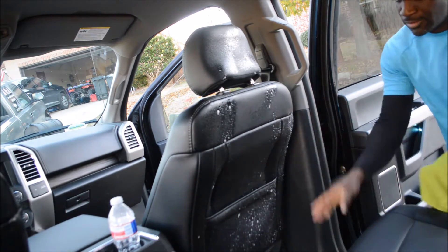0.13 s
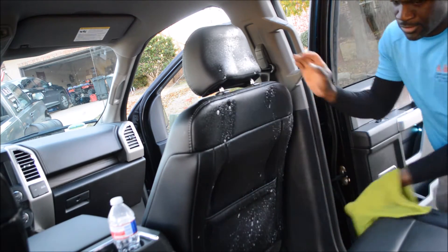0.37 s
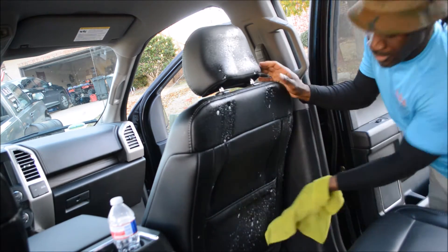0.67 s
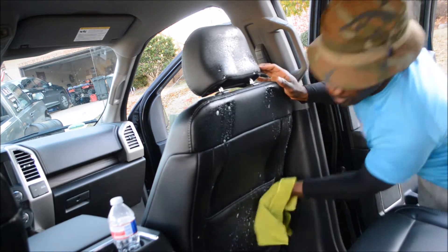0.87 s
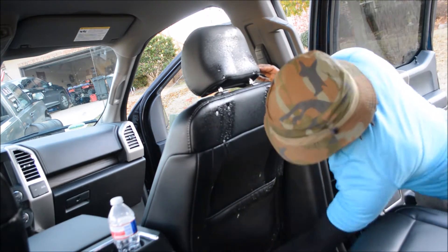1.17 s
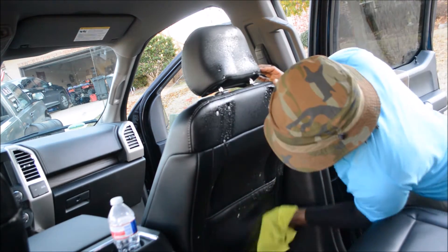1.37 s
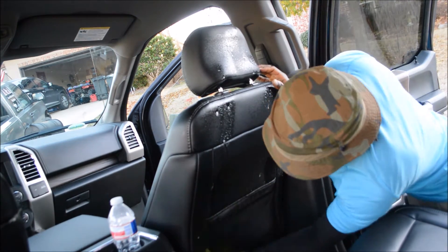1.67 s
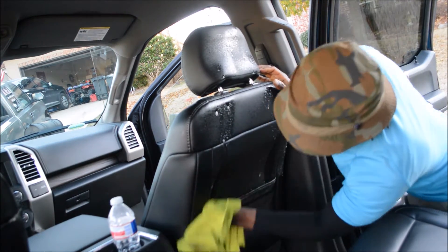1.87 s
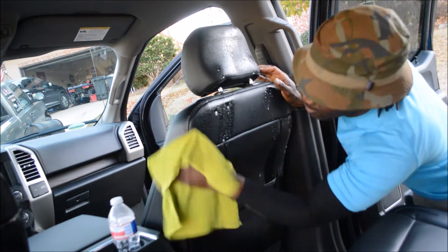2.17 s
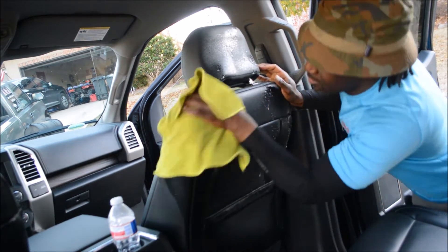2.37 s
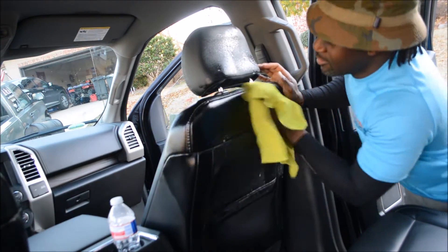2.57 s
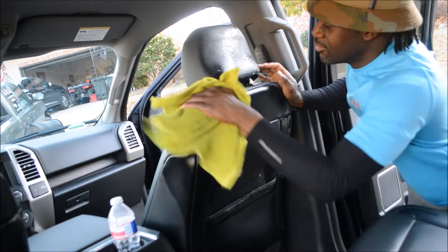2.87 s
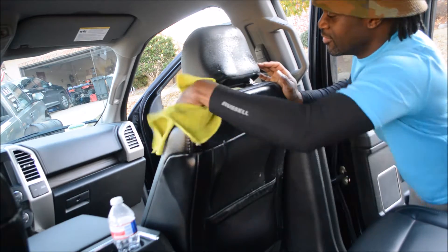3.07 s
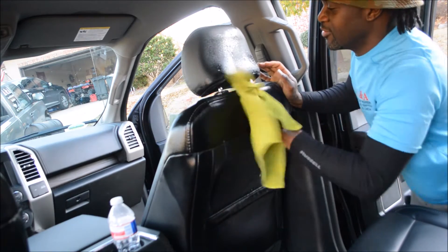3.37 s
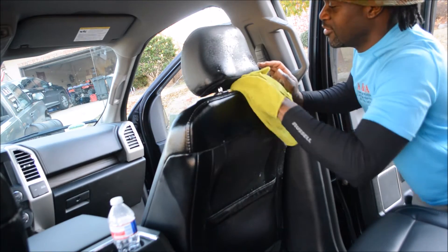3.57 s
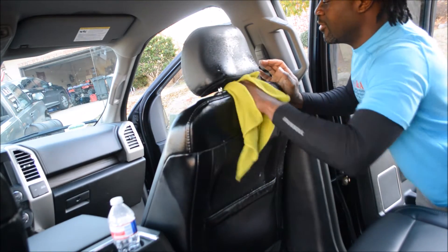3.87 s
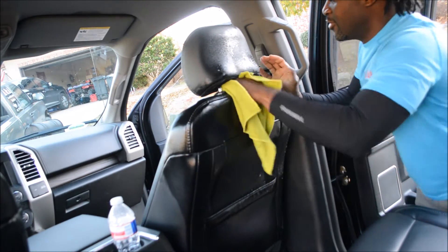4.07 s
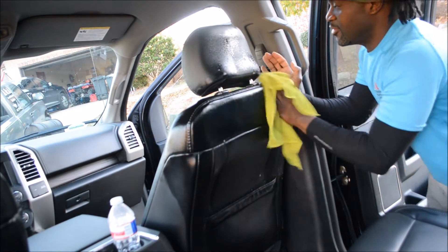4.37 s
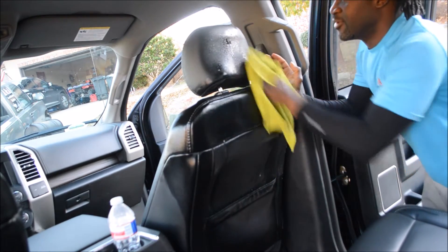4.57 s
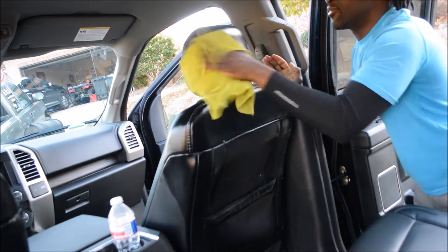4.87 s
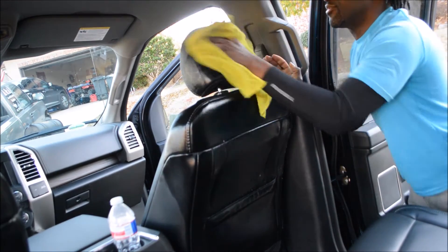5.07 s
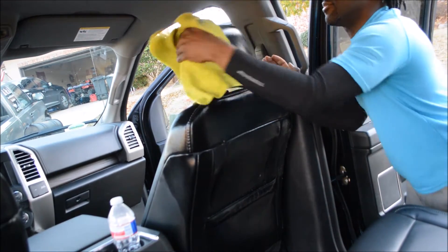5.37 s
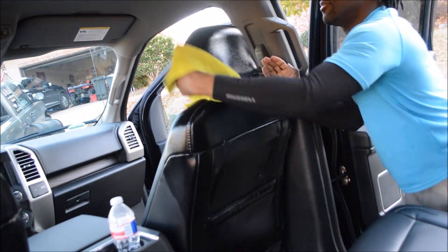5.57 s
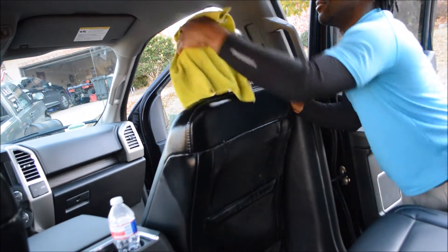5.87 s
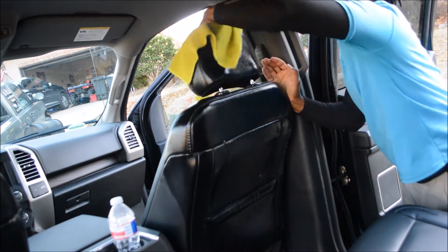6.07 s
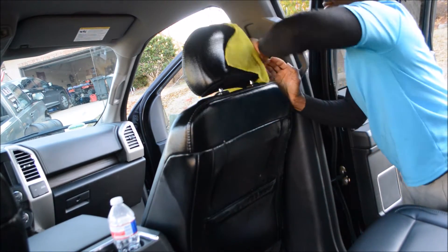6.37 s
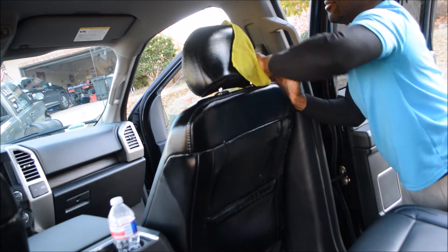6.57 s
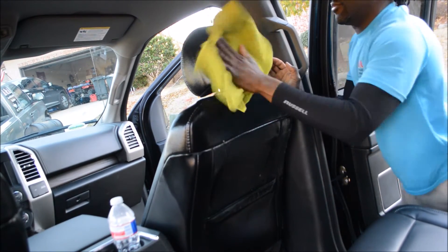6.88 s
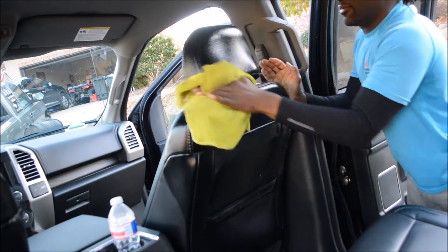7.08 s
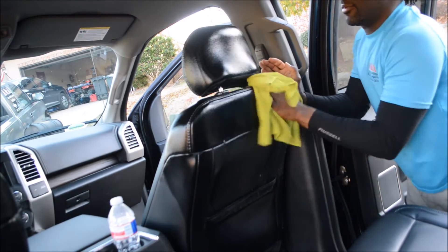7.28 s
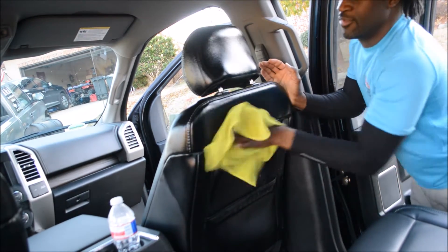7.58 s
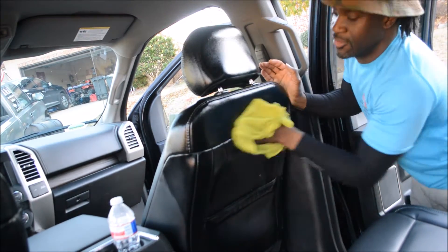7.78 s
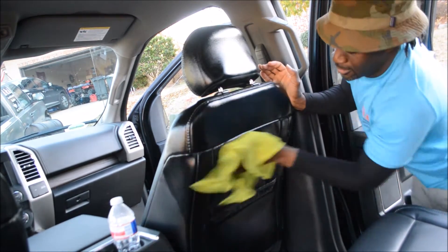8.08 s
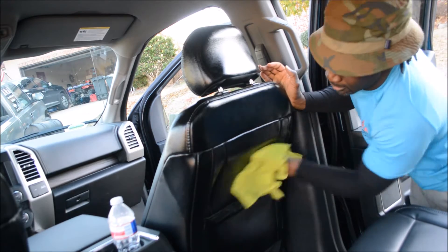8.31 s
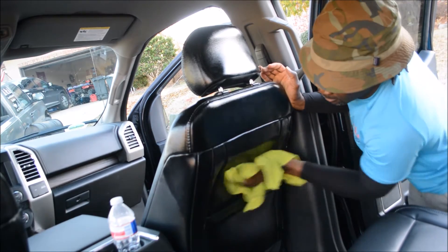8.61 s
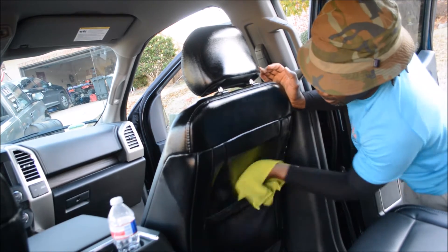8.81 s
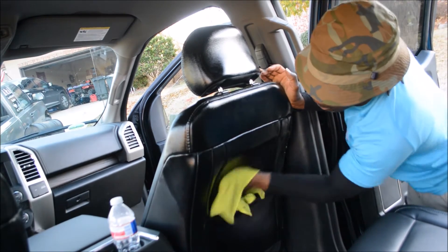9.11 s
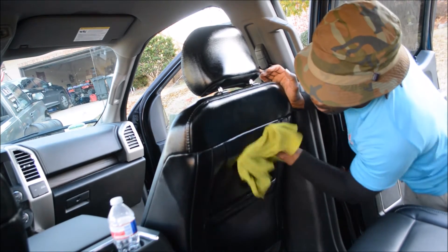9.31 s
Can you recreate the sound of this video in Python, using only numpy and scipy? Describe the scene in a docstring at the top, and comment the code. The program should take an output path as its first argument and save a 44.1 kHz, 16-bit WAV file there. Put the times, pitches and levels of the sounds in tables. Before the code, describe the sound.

A cloth towel rubs a leather car seat in quick, uneven strokes, hissing and rasping, with a few hollow knocks over faint outdoor noise.

```python
"""A cloth towel is wiped over a leather seat back and head rest in a car cabin with the doors open.
Its fibres hiss on the leather as filtered noise; the same drag shakes the seat shell, back panel and cushion.
Hand and towel knock the seat now and then, with slaps of noise and dying notes; sticking leather groans.
Behind this, a bird chirps faintly in falling whistles over steady outdoor noise. Both channels are the same."""
import sys
import numpy as np
from scipy import signal
from scipy.fft import rfft, irfft, next_fast_len
from scipy.io import wavfile

SR = 44100
rng = np.random.default_rng(int(sys.argv[2]) if len(sys.argv) > 2 else 0)


def wav_record(signal):
    """Record a signal, one row per channel, as 16-bit PCM in the file named by sys.argv[1]."""
    frames = np.transpose(np.atleast_2d(signal))
    bounded = np.clip(frames, -1, 1)
    # unit amplitude maps onto the largest positive 16-bit level
    quanta = np.round(bounded * 32767).astype(np.int16)
    wavfile.write(sys.argv[1], SR, quanta)


N = 416744   # length in samples


def from_db(db):
    """Turns decibels into a plain amplitude factor."""
    return 10 ** (np.asarray(db) / 20)


def rms_one(x):
    """Scales a signal so that its average strength (rms) is 1."""
    return x / np.sqrt(np.mean(x ** 2) + 1e-20)


def drift(rate_hz):
    """Slow random wandering of rms 1: noise through two equal one-pole low-passes at rate_hz."""
    step = 40   # worked out at every 40th sample, then joined by straight lines
    r = np.exp(-2 * np.pi * step * rate_hz / SR)
    noise = rng.standard_normal(N // step + 2002)
    slow = signal.lfilter([1], [1, -2 * r, r * r], noise)[2000:]   # skip the filter's start
    return np.interp(np.arange(N) / step, np.arange(len(slow)), rms_one(slow))


def coloured(x, spectrum):
    """Shapes x in frequency by joining the (f/Hz, level/dB) points; the result has rms 1."""
    size = next_fast_len(N)
    point_hz, point_db = np.transpose(spectrum)
    bin_hz = np.arange(size // 2 + 1) * SR / size
    gain = from_db(np.interp(np.log(bin_hz + 1), np.log(point_hz), point_db))
    return rms_one(irfft(rfft(x, size) * gain, size)[:N])


def ring(clicks, hz, t60):
    """Each unit click starts a sine of height 1 that falls by 60 dB in t60 seconds."""
    r = from_db(-60 / (t60 * SR))
    turn = 2 * np.pi * hz / SR
    return signal.lfilter([0, np.sin(turn)], [1, -2 * r * np.cos(turn), r * r], clicks + 1e-18)


def note(hz, db, rise, t60):
    """A sine that swells within about rise seconds and dies away by 60 dB in t60 seconds."""
    t = np.arange(SR // 3) / SR
    swell = 1 - np.exp(-(t / rise) ** 2)
    return from_db(db - 60 * t / t60) * swell * np.sin(2 * np.pi * hz * t)


def pressure(rise, fall):
    """The hand presses down and lets go again: 0 to 1 to 0, along a sine curve."""
    up = np.linspace(0, 1, round(rise * SR))
    down = np.linspace(1, 0, round(fall * SR))
    return np.sin(np.pi / 2 * np.r_[up, down])


# relative spectrum of the fibre hiss: f/Hz, level/dB (per Hz)
FIBRE_SPECTRUM = [(880, -64), (1500, -35), (1920, -13.5), (2760, -10), (3130, -10.5), (3530, -8.5),
                  (3740, -7.5), (6050, -8), (8880, 2.5), (11000, -5.5), (15700, -20.5)]
# low modes of cushion and frame: f/Hz, relative level/dB, t60/s
CUSHION_MODES = [(30.4, 1.5, 0.27), (53, -1.5, 0.29), (78, 2.5, 0.21), (98, -14.5, 0.24), (136.7, -1, 0.18),
                 (210, -1.5, 0.086), (256, -12, 0.16), (327, -2, 0.074)]
# resonances of the hollow back panel: f/Hz, width/Hz, relative level/dB, signed weight
PANEL_MODES = [(755, 37, -4.5, 0.75), (1217, 84, 1, -1.09), (1389, 114, 4.5, 0.79)]
# times when the towel is on that panel: from t/s, to t/s, level against the shell/dB
ON_PANEL = [(0.8, 1.786, 0), (1.8, 2.65, -5.5), (3.1, 3.5, -2), (7.0, 8.0, -3), (8.0, 9.446, -5)]


def wiping():
    """The same drag hisses in the fibres, rings the shell and back panel, and jogs the cushion."""
    drag, shake, taut_db, rock = strokes()
    judder_db = drift(29)   # the grip of the hand is never even
    fibres = coloured(catches(20000, spread_db=2.0), FIBRE_SPECTRUM)
    hiss = fibres * drag * from_db(1.04 * judder_db)

    grain = catches(4000, spread_db=3.0)
    rasp = rms_one(shell(grain, taut_db, patchy_db=1.5))
    hum = rms_one(shell(grain, 0, patchy_db=2.0, modes=PANEL_MODES))
    t = np.arange(N) / SR
    on_panel = sum(from_db(db) * ((t >= start) & (t < end)) for start, end, db in ON_PANEL)
    body = (rasp + hum * on_panel) * shake * from_db(1.2 * judder_db)

    pushes = catches(140, spread_db=2.5)
    jogs = 0
    for hz, db, t60 in CUSHION_MODES:
        jogs = jogs + from_db(db) * ring(pushes * rng.standard_normal(N), hz, t60)
    foam = signal.butter(2, [28, 400], "band", fs=SR, output="sos")   # foam takes the edge off
    padded = signal.sosfilt(foam, jogs)
    return hiss + body + rms_one(padded) * rock


# strokes of the towel: firmest moment t/s, rise/s, fall/s, fibre hiss level/dB, seat shell level/dB,
# tautness under the hand/(dB per octave), cushion level/dB; levels are before the judder
STROKES = [(0.226, 0.021, .03, -52, -55, 4, -55), (0.46, 0.14, 0.03, -56.5, -54.5, 4, -45),
           (0.528, 0.037, .05, -45, -34, -1, -46), (0.76, 0.045, 0.044, -43.5, -47, -2, -44.5),
           (0.992, .22, 0.24, -37.5, -35, 0.5, -50), (1.289, 0.23, 0.17, -38, -35.5, 1, -43.5),
           (1.492, 0.19, 0.26, -38, -36, 2, -58), (1.68, .12, 0.13, -38.5, -47.5, 2, -48.5),
           (1.857, 0.13, 0.07, -35, -35, 2, -42.5), (2.01, 0.3, 0.17, -40.5, -48, -6, -47.5),
           (2.224, .17, 0.085, -37.5, -40.5, -2.5, -51), (2.55, 0.4, 0.11, -40.5, -41, -0.5, -52.5),
           (2.729, 0.11, 0.1, -39, -34, 0.5, -53), (2.85, 0.11, 0.063, -45, -52.5, -5, -43.5),
           (2.96, 0.1, 0.15, -43.5, -47, -5, -46), (3.336, 0.26, 0.15, -41, -43, -4, -51.5),
           (3.45, 0.045, 0.045, -42, -44.5, 1.5, -48), (3.51, .04, 0.037, -51, -48, -1, -58),
           (3.62, 0.037, 0.11, -62, -59.5, 1, -52), (3.69, 0.013, 0.055, -48.5, -49.5, 2, -55),
           (3.87, 0.11, 0.14, -43.5, -45, -1, -48.5), (4.0, .1, 0.066, -44.5, -46, 0, -42),
           (4.12, 0.068, .08, -51, -51, -1, -44), (4.3, .2, 0.13, -42, -43, -2.5, -49),
           (4.41, 0.033, 0.044, -60, -37.5, -1, -50), (4.6, 0.2, 0.13, -41, -42, -3, -52),
           (4.74, 0.098, 0.077, -39.5, -40, 1.5, -59), (4.782, 0.13, 0.045, -41, -38.5, 1.5, -41),
           (4.88, 0.081, 0.12, -38, -36.5, -3.5, -42), (5.03, 0.058, 0.11, -37, -39, -2.5, -47),
           (5.18, 0.063, 0.042, -38.5, -53, -6, -40), (5.27, 0.054, 0.42, -43.5, -53, -6, -46.5),
           (5.6, .17, 0.14, -42.5, -52.5, -3.5, -49), (5.76, 0.15, 0.1, -42, -52.5, -11, -50),
           (5.97, 0.4, 0.14, -43, -44, -2.5, -58), (6.11, 0.15, 0.1, -45, -55, -3, -60),
           (6.256, 0.14, 0.12, -42, -46.5, -3, -47.5), (6.44, 0.15, .055, -43, -53.5, -4, -50),
           (6.62, 0.17, 0.3, -43, -53, -3.5, -61), (6.769, .1, 0.083, -41, -40, -1.5, -67),
           (6.89, 0.18, 0.17, -39.5, -47, -4, -53), (7.1, 0.097, 0.2, -41.5, -44, -7, -47),
           (7.229, 0.13, .075, -44, -43, -0.5, -57), (7.46, 0.2, 0.098, -39, -37.5, 0, -49.5),
           (7.612, 0.11, .11, -39, -33, 0.5, -49), (7.808, 0.13, 0.2, -38.5, -35, 1.5, -44.5),
           (8.049, 0.12, 0.15, -41.5, -38, -2, -41), (8.18, 0.093, 0.034, -51, -37, -2.5, -38.5),
           (8.3, 0.18, 0.48, -47, -47.5, 0, -51.5), (8.616, 0.14, 0.13, -49, -42, -2.5, -42.5),
           (8.82, 0.14, .1, -49.5, -47.5, -4, -57), (8.96, 0.22, 0.098, -46, -44.5, 0, -54),
           (9.1, 0.081, 0.15, -48, -43, -1.5, -52), (9.44, 0.26, .1, -46, -47.5, -2.5, -51)]
HISS_POWER, SHELL_POWER = 0.98, 2.25   # hiss nearly follows the pressure; the shell needs a firm push
CUSHION_SETTLE_S = 0.041


def strokes():
    """Overlapping strokes add their power; tautness leans to the stroke that shakes the shell most."""
    hiss, shake, taut, rock = np.zeros((4, N + SR))
    for s, rise, fall, hiss_db, shell_db, taut_db, cushion_db in STROKES:
        rise, fall = max(rise, .005), max(fall, .005)
        push = pressure(rise, fall)
        start = round((s - rise) * SR)
        span = slice(start, start + len(push))
        shell_power = (from_db(shell_db) * push ** SHELL_POWER) ** 2
        hiss[span] += (from_db(hiss_db) * push ** HISS_POWER) ** 2
        shake[span] += shell_power
        taut[span] += shell_power * taut_db
        rock[span] += from_db(cushion_db) ** 2 * push
    taut_db = taut / (shake + 1e-12)
    r = np.exp(-1 / (CUSHION_SETTLE_S * SR))
    settled = signal.lfilter([1 - r], [1, -r], rock[:N])   # the cushion follows the push late
    return np.sqrt(hiss[:N]), np.sqrt(shake[:N]), taut_db[:N], np.sqrt(settled)


def catches(per_s, spread_db):
    """Loops of the towel catch on the leather grain and let go: random clicks of uneven size."""
    sizes = from_db(spread_db * np.minimum(rng.exponential(1, N), 5))
    signs = rng.choice([-1, 1], N)
    happens = rng.random(N) < per_s / SR
    return rms_one(sizes * signs * happens)


# resonances of the seat shell under rubbing and slaps: f/Hz, width/Hz, relative level/dB, signed weight
SHELL_MODES = [(420, 520, -14.5, 0.89), (586, 105, -6.5, -1.05), (790, 165, -1, 0.45),
               (1131, 270, 1, 0.041), (1365, 249, 0, -0.89), (1610, 456, -0.5, 0.68),
               (2028, 503, -3.5, -0.65), (2430, 260, -7, -0.58), (3116, 780, -7, 0.65),
               (4610, 2700, -15.5, -0.71)]


def shell(force, taut_db, patchy_db, modes=SHELL_MODES):
    """Resonances side by side; a taut spot favours the high ones, and each wavers in level."""
    out = 0
    for hz, width_hz, db, weight in modes:
        r = np.exp(-np.pi * width_hz / SR)
        b = np.array([1, 0, -1]) * (1 - r * r) / 2
        a = [1, -2 * r * np.cos(2 * np.pi * hz / SR), r * r]
        mode = signal.lfilter(b, a, force)
        tilt_db = taut_db * np.log2(hz / 1200)   # tautness tips the balance around 1200 Hz
        out = out + weight * from_db(db + tilt_db + patchy_db * drift(33.0)) * mode
    return out


# knocks and scuffs, with relative levels: t/s, slap level/dB, slap treble level/dB, slap fall/s (by 30 dB),
# tautness/(dB per octave), shell note f/Hz, its level/dB,
# panel level/dB, cushion level/dB, frame level/dB, cabin boom level/dB
KNOCKS = [(0.049, -29.5, -17, 0.046, 1, 1235, -39, -29, -36, -36, -16.5),
          (0.205, -40, -40, 0.051, 1, 1330, -52, -41, -32, -50, -44),
          (0.256, -2, -1, 0.023, -0.5, 1230, -16, -18, -35, -9.5, -14.5),
          (0.51, -34, -37, 0.031, 6.5, 1370, -38, -29, -45, -54, -55),
          (0.792, -33, -21, 0.11, -5, 1240, -38, -41, -32.5, -53, -51),
          (0.839, -26, -40, 0.015, 1, 2100, -32, -41, -59, -40, -44),
          (1.109, -17, -8, 0.025, -15, 775, -18, -26, -17.5, -33, -41),
          (1.141, -8, -4.5, 0.028, -2.5, 1570, -22, -27, -50, -50, -55),
          (1.862, -17, -23, 0.024, -2, 1490, -36, -34, -30.5, -51, -31.5),
          (2.72, -14, -40, 0.019, 2, 1255, -19, -49, -55, -57, -58),
          (3.416, -45, -40, 0.03, 2, 859, -38, -36, -42, -55, -55),
          (3.532, 1, 9.5, 0.015, -6, 880, -5.5, -21, -23.5, -32, -45),
          (3.541, -16, -10, 0.021, -3.5, 700, -20.5, -31, -41, -24.5, -43),
          (3.683, -41, -19, 0.039, -14.5, 1260, -44, -35, -38, -27.5, -57),
          (4.402, -29, -30, 0.048, 2.5, 720, -35, -26, -50, -72, -86),
          (4.609, -43, -35, 0.04, -14, 824, -36, -40, -35, -29, -45),
          (4.785, -20, -42, 0.012, -12.5, 1116, -23.5, -22.5, -18, -28, -22),
          (4.878, -15, -35, 0.034, 1.5, 625, -22, -33.5, -49, -48, -54),
          (5.001, -18, -14, 0.019, -0.5, 1520, -25, -30.5, -35, -39, -57),
          (5.061, -15.5, -27, 0.023, 0, 710, -26.5, -48, -55, -49, -52),
          (5.162, -18.5, -32, 0.049, -6.5, 1285, -25, -23.5, -25, -30, -21.5),
          (5.371, -31.5, -48, 0.024, -8, 1300, -39, -42, -50, -50, -56),
          (5.383, -40, -50, 0.022, -8, 700, -55, -55, -44, -31.5, -33.5),
          (6.444, -34.5, -40, 0.074, -5, 587, -47, -41, -50, -39, -46),
          (6.98, -33, -37, 0.019, -11, 690, -32.5, -44, -41, -42, -50),
          (6.999, -47, -43, 0.02, -9, 705, -50, -37, -32.5, -34.5, -46),
          (7.166, -30, -35, 0.047, 0, 810, -39, -47, -27, -50, -41),
          (7.849, -30, -45, 0.045, -3, 1240, -39, -53, -39, -34, -53),
          (8.025, -16.5, -11.5, 0.033, -2, 870, -25, -30.5, -30, -50, -47),
          (8.053, -19, -30, 0.01, 6, 885, -24, -30, -48, -44, -45),
          (8.162, -18.5, -11, 0.024, 2.5, 690, -22.5, -45, -45, -34, -43),
          (8.222, -16.5, -8, 0.015, 3.5, 1430, -28, -31, -62, -51, -49),
          (8.406, -33, -44, 0.027, 0, 610, -37, -43, -32, -49, -45),
          (8.61, -35, -16, 0.034, 6, 670, -27, -54, -27.5, -38, -31),
          (8.843, -30, -9.5, 0.022, 7.5, 1350, -45, -49, -43, -43, -40)]
# notes of a knock, one group each for panel, cushion, frame and cabin:
# f/Hz, relative level/dB, rise/s, t60/s
STRUCK_NOTES = [
    [(152.6, -3.5, 0.00099, 0.15), (200.8, 1.5, 0.0024, 0.096), (230.4, -3.5, 0.0041, 0.071),
     (333, -4, 0.0032, 0.068)],
    [(123.5, 4, 0.013, 0.14), (109.2, -6, 0.0069, 0.16)],
    [(76.1, 3, 0.0084, .2), (87.5, -6, 0.018, 0.19)],
    [(57.4, 0, 0.018, 0.38), (64.3, -2, 0.013, 0.36)],
]
# relative spectrum of the bright part of a slap: f/Hz, level/dB (per Hz)
CRACK_SPECTRUM = [(880, -40), (1900, -12), (3000, -8), (4200, -13), (6500, -9), (8800, 5), (10500, -6),
                  (15700, -34)]


def knocks():
    """Each knock is a slap of noise with a bright crack, and notes that swell and die away."""
    slap, bright, taut_db, out = np.zeros((4, N))
    t = np.arange(SR // 3) / SR
    parts = np.array([sum(note(*mode) for mode in modes) for modes in STRUCK_NOTES])
    for s, slap_db, treble_db, fall, spot_db, ring_hz, ring_db, *parts_db in KNOCKS:
        start = round(s * SR)
        span = slice(start, start + len(t))
        attack = np.minimum(t / 0.0036, 1)
        fall = max(fall, .004)
        slap[span] += from_db(slap_db - 30 * t / fall) * attack
        sharp = from_db(-30 * t / (0.2 * fall))
        cabin_tail = 0.22 * from_db(-30 * t / (1.8 * fall))
        bright[span] += from_db(treble_db) * attack * (sharp + cabin_tail)
        taut_db[span] = spot_db
        out[span] += note(ring_hz, ring_db, rise=0.001, t60=0.033)
        out[span] -= from_db(parts_db) @ parts   # these parts start in the opposite direction
    out += from_db(8) * shell(slap * rng.standard_normal(N), taut_db, patchy_db=2.0)
    return out + from_db(-14.5) * bright * coloured(rng.standard_normal(N), CRACK_SPECTRUM)


# groans and squeaks where the leather sticks: start t/s, nominal length/s (lasts 1.1 times this),
# level/dB (before the flutter), first f/Hz, last f/Hz
GROANS = [(0.367, 0.062, -53, 1400, 1530), (0.497, 0.058, -29.5, 1410, 1500), (5.795, 0.13, -44, 215, 260),
          (5.921, 0.052, -40, 294, 335), (7.708, 0.12, -52, 394, 357), (8.223, 0.098, -41, 696, 725),
          (8.378, 0.05, -42.5, 618, 590)]


def groans():
    """A gliding pitch whose strength flutters at random: a narrow, rough band."""
    out = np.zeros(N)
    flutter, other = drift(70), drift(70)
    for s, length, db, first_hz, last_hz in GROANS:
        level = from_db(db) * pressure(0.73 * length, 0.37 * length)
        start = round(s * SR)
        span = slice(start, start + len(level))
        turn = 2 * np.pi * np.cumsum(np.linspace(first_hz, last_hz, len(level))) / SR
        out[span] += level * (flutter[span] * np.cos(turn) + other[span] * np.sin(turn))
    return out


# bird calls: start t/s, nominal length/s (lasts 1.19 times this), rms level at the peak/dB
# (before it is broken up), first f/Hz
CHIRPS = [(0.585, .085, -59, 3850), (0.665, .075, -63, 4420), (0.705, .078, -56, 3850)]
CHIRP_DROP_HZ = 485


def bird():
    """Short falling whistles, broken up by distance."""
    out = np.zeros(N)
    broken = from_db(6 * drift(50))
    for s, length, db, top_hz in CHIRPS:
        level = pressure(0.96 * length, 0.23 * length)
        hz = top_hz - CHIRP_DROP_HZ * np.linspace(0, 1, len(level)) ** 1.5
        whistle = np.sin(2 * np.pi * np.cumsum(hz) / SR)
        start = round(s * SR)
        out[start:start + len(level)] += np.sqrt(2) * from_db(db) * level * whistle
    return out * broken


# relative spectrum of the outdoor noise: f/Hz, level/dB (per Hz)
OUTDOOR_SPECTRUM = [(13, -32), (22, -3), (109, 8.5), (309, -0.5), (430, -9.5), (667, -3), (1010, -9),
                    (1260, -6.5), (2240, -9.5), (4580, -17.5), (6550, -18.5), (8870, -14.5), (15800, -25)]
OUTDOORS_DB = -51.5   # rms level before it wavers


def outdoors():
    """Shaped noise from outside, whose level wavers slightly."""
    level = from_db(OUTDOORS_DB + 1.0 * drift(22))
    return level * coloured(rng.standard_normal(N), OUTDOOR_SPECTRUM)


def scene():
    """All sources add up at one microphone, which feeds both channels."""
    mono = wiping() + knocks() + groans() + bird() + outdoors()
    return np.stack([mono, mono])


CUTOFF_HZ = 15750


def record(dry):
    """A steep low-pass cuts off the top of the treble."""
    low_pass = signal.ellip(12, .5, 80, CUTOFF_HZ, fs=SR, output="sos")   # 0.5 dB ripple, 80 dB cut
    return signal.sosfilt(low_pass, dry)


dry = scene()
out = record(dry)
wav_record(out)
```